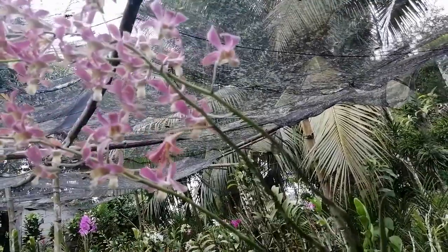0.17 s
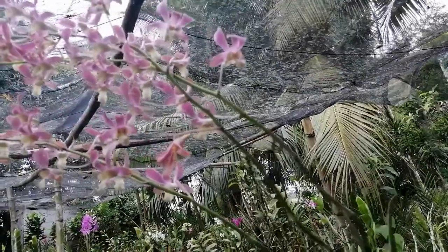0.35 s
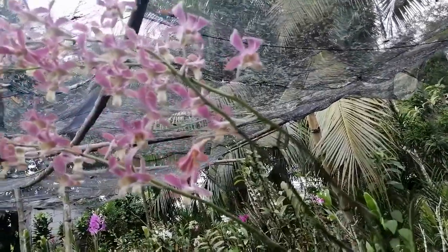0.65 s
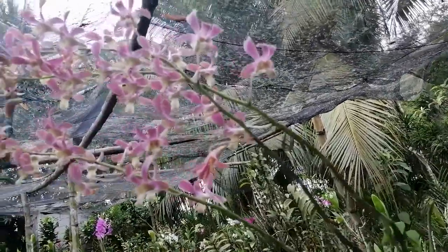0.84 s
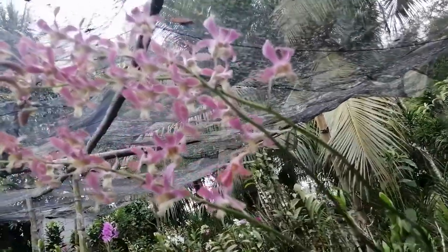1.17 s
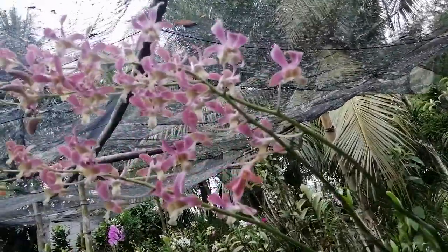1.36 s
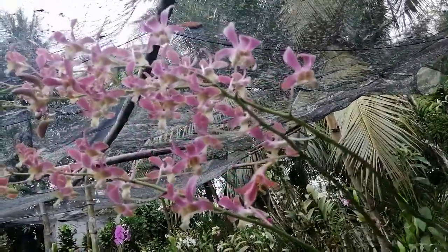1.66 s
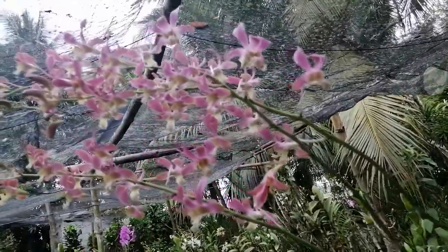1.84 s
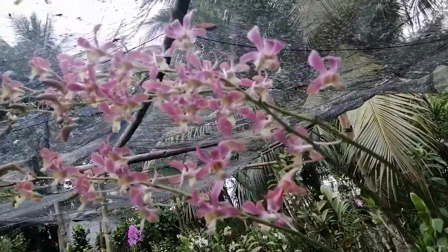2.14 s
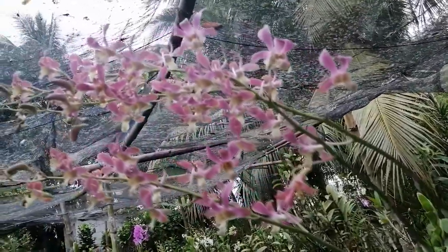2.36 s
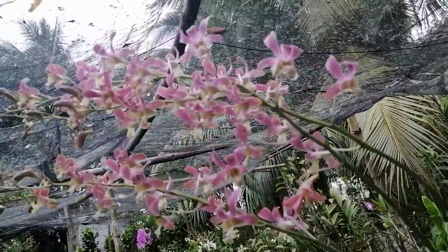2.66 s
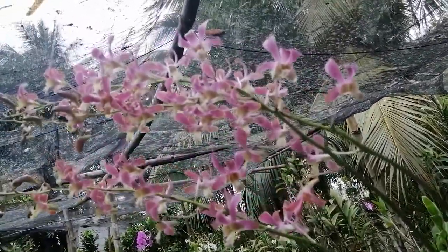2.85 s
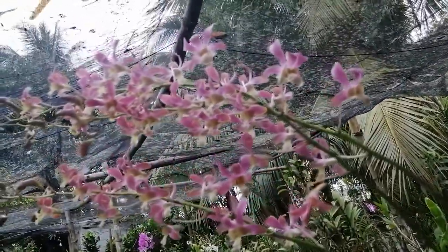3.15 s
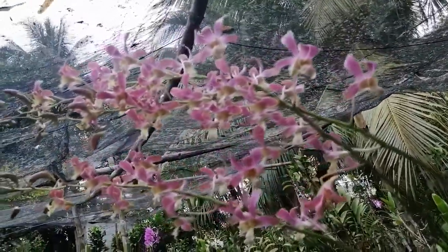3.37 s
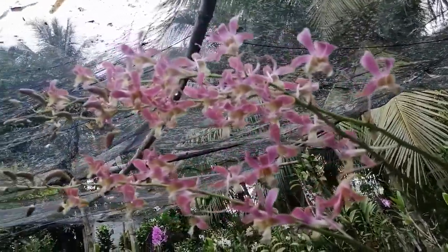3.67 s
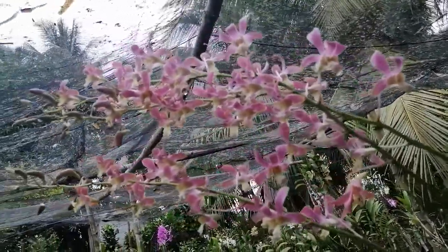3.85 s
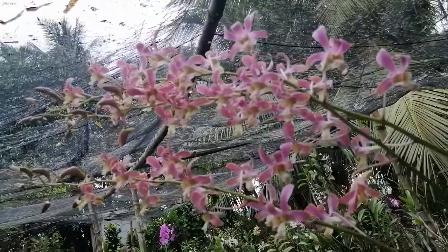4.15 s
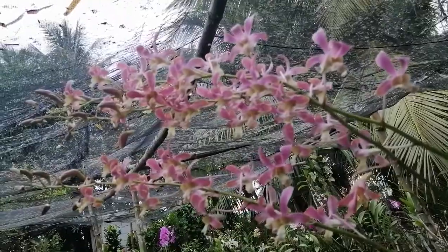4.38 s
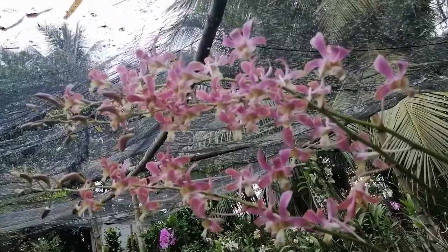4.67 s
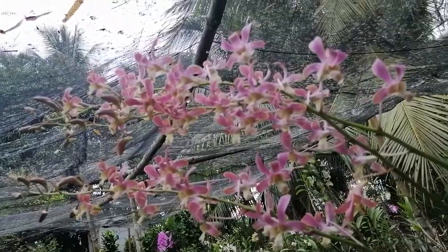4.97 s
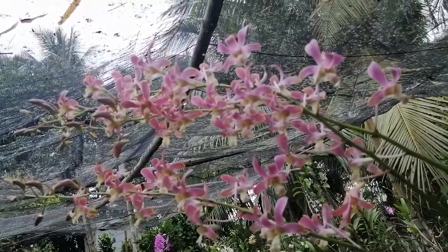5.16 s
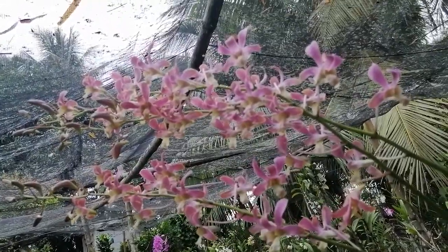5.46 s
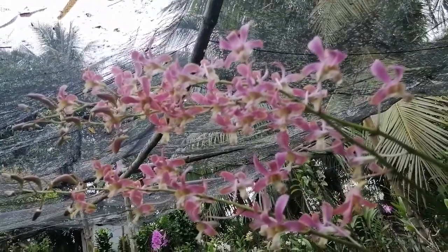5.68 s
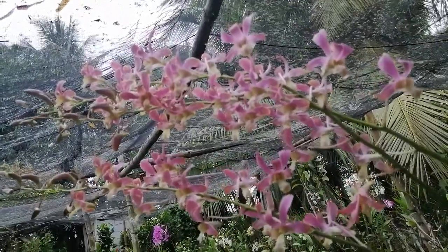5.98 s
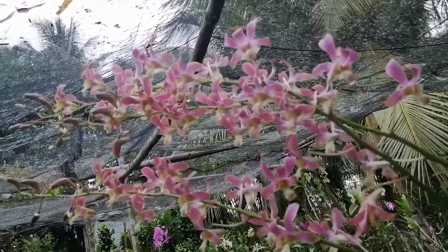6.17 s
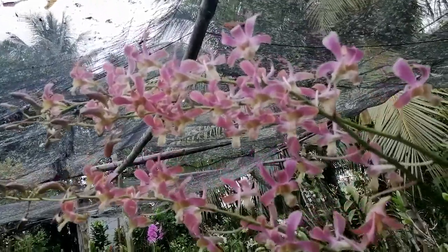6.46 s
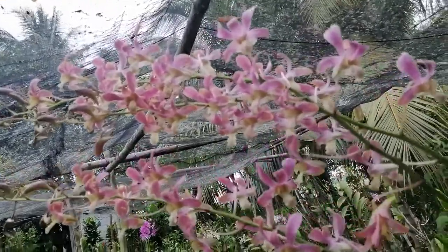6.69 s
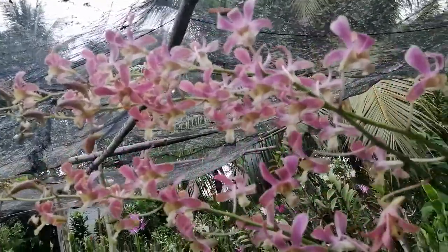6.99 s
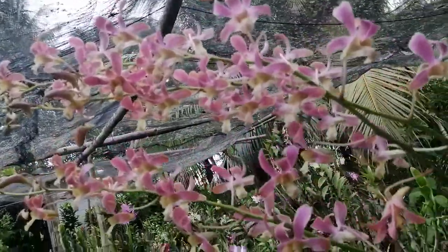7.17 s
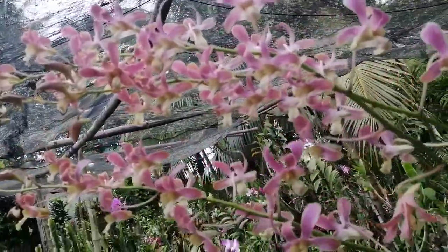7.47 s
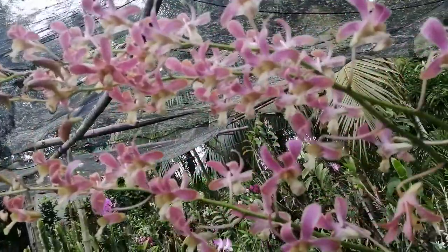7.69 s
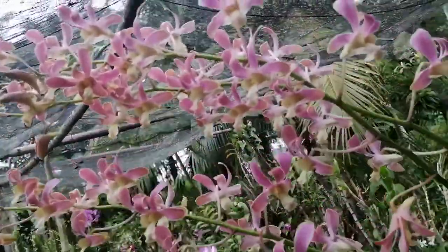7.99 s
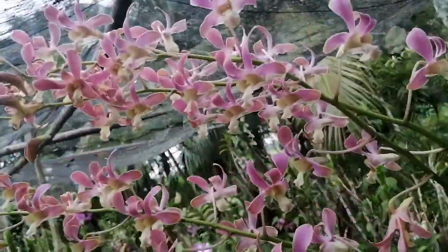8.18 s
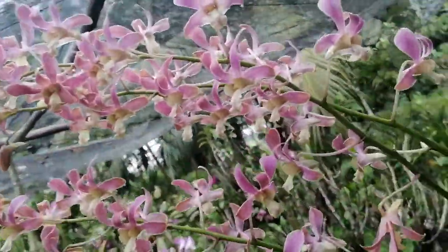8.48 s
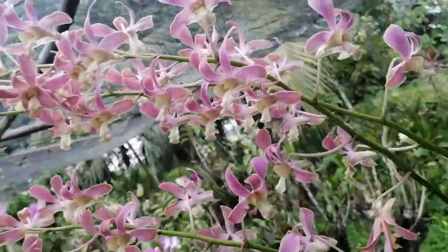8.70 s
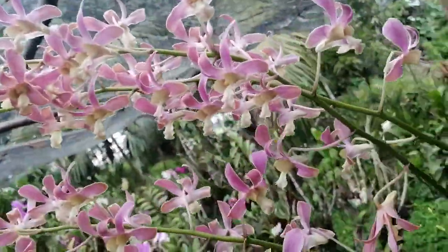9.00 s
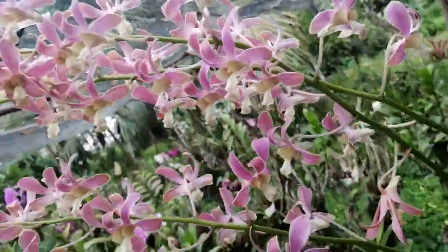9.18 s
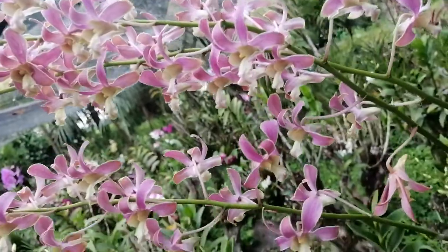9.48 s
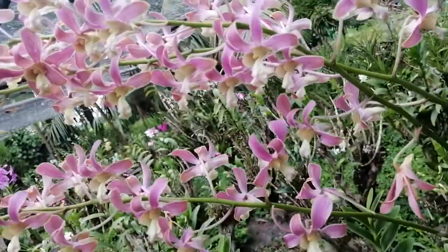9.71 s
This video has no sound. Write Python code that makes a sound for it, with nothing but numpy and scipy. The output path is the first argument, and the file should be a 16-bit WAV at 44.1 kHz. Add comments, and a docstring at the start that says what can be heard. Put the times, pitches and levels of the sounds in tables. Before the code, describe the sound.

Small birds tick, whistle and chatter over a steady high insect drone, with faint far roosters and a dull distant engine in a garden.

```python
"""Tropical garden with birds and a far engine

Insects drone high in the trees while small birds tick, whistle and chatter in the foliage.
Roosters crow far away, an engine thuds in the distance, and light air rumbles underneath.
Birds are gliding, wavering tones with leafy echoes; insects and air are shaped noise.
The engine is a train of puffs ringing in its exhaust pipe, with a deep boom of pure tones."""
import sys
import numpy as np
from scipy import signal
from scipy.fft import rfft, irfft
from scipy.io import wavfile

SR = 44100
rng = np.random.default_rng(int(sys.argv[2]) if len(sys.argv) > 2 else 0)


def dump(signal):
    """Clip the signal to [-1, 1] and save it as 16-bit WAV at the path in sys.argv[1]."""
    limited = np.clip(np.atleast_2d(signal).T, -1, 1)
    pcm = np.round(limited * 32767).astype(np.int16)
    wavfile.write(sys.argv[1], SR, pcm)


N = 433944
TIME = np.arange(N) / SR
FREQS = np.maximum(np.fft.rfftfreq(N, 1 / SR), 1)

# Levels in the tables come before any trim that a source adds.
# Moving air and far garden: tone colour (f/Hz, relative level/dB)
AIR = [(15, -6), (30, -8.5), (48, -7), (70, -3), (140, 3), (190, -5.5), (283, -16), (484, -21),
       (808, -23.5), (1500, -26), (2200, -25), (3100, -28.5), (3950, -36.5), (5200, -21), (6600, -26),
       (8580, -26), (14000, -79)]
# Likeness of its left and right sides (f/Hz, likeness from 0 to 1)
LIKENESS = [(25, 0.66), (80, 0.94), (200, 0.83), (500, 0.51), (1200, 0.012), (6000, 0.097)]
# Its balance (f/Hz, left minus right level/dB)
AIR_PAN = [(100, -2), (500, 1.5), (1500, -4), (3000, -4), (6000, -6), (8300, 13.5)]
# Faint steady tones (centre f/Hz, level/dB)
FAR_HUM = [(48, -66), (398, -80), (465, -88.5), (531, -80.5), (555, -89), (595, -85)]
# Engine speed (t/s, firing rate f/Hz)
ENGINE_RATE = [(0.0, 21.5), (0.13, 22.5), (0.85, 22.0), (1.29, 21.5), (2.14, 21.5), (2.68, 22),
               (4.44, 21.5), (4.93, 22), (6.69, 23), (7.67, 22), (9.48, 22.5), (9.84, 22.5)]
# Loudness of the engine's thud (t/s, level/dB)
ENGINE_DB = [(0, -97), (.8, -63), (1.3, -54), (2.3, -55.5), (2.7, -50.5), (3.4, -50.5), (4.7, -49.5),
             (5.4, -54), (5.95, -49), (6.65, -54.5), (7, -47), (7.7, -49.5), (8.3, -51), (9, -54.5),
             (9.84, -61.5)]
# Exhaust pipe resonances (f/Hz, width/Hz before doubling, relative level/dB)
EXHAUST = [(143.5, 40.4, 1), (177.6, 40, 2), (294, 97, -22)]
# Deep boom of the engine (multiple of the firing rate, centre of its varying relative level/dB)
BOOM = [(2, -22), (3, -21), (4, -9.5), (5, -6.5), (6, -9)]
# Loudness of that boom (t/s, level/dB)
BOOM_DB = [(0, -66), (2.5, -66), (5, -68.5), (6, -50.5), (7.5, -51.5), (8.7, -52), (9.84, -58.5)]
# Hoarse notes of far roosters (t/s, length/s, start f/Hz, end f/Hz, level/dB)
CROWS = [(1.06, 0.2, 883, 975, -60), (1.1, 0.23, 1110, 1060, -57.5), (1.26, 0.148, 1010, 879, -58),
         (1.38, 0.16, 1170, 1064, -63.5), (1.47, 0.16, 936, 1000, -57), (1.6, .12, 1065, 983, -56),
         (1.79, 0.067, 903, 966, -67), (2.93, 0.12, 830, 950, -58), (3.01, 0.18, 1090, 1072, -60),
         (3.12, 0.16, 990, 905, -58.5), (3.32, 0.2, 903, 992, -65), (3.55, 0.15, 1055, 1048, -60),
         (4.66, 0.12, 966, 917, -56.5), (4.72, 0.22, 1165, 988, -56), (4.945, 0.088, 913, 862, -46),
         (4.97, 0.123, 824, 763, -57), (6.46, 0.25, 691, 725, -59), (6.725, 0.076, 655, 672, -51.5),
         (6.8, 0.15, 646, 634, -59), (7.51, 0.08, 924, 1050, -60), (7.58, 0.16, 1157, 1087, -64),
         (7.72, 0.091, 1054, 988, -55), (7.82, 0.098, 980, 937, -60), (7.97, 0.087, 961, 1047, -58.5)]
# Drawn-out answers from farther off (t/s, length/s, start f/Hz, end f/Hz, level/dB)
DRAWLS = [(5.05, 0.29, 827, 810, -65), (5.12, 0.65, 1107, 1231, -68), (5.15, 0.75, 704, 761, -69.5),
          (5.55, 0.56, 779, 827, -71), (5.75, 0.51, 1126, 1050, -67.5), (5.95, 0.242, 878, 925, -69),
          (6.18, 0.35, 970, 907, -69.5), (6.25, 0.54, 643, 657, -68.5)]
# Throat resonances of the squawk (f/Hz, width/Hz of each of two passes, relative level/dB)
SQUAWK_THROAT = [(390, 250, -5.5), (760, 480, -2.5), (1100, 144, 8), (1750, 520, -1), (3330, 520, 8)]
# Soft taps close by (t/s, peak level/dB)
TAPS = [(6.83, -63), (8.52, -58), (8.988, -46.5), (9.201, -36.5)]
# Insect loudness (t/s, pulsing singer level/dB, higher chorus level/dB)
INSECTS = [(0.0, -51.5, -55), (0.19, -48, -56), (0.87, -52.5, -54.5), (1.4, -46, -54.5), (1.64, -51, -54.5),
           (2.44, -49, -55), (2.99, -51.5, -53.5), (3.42, -47, -54), (3.64, -52.5, -54), (4.47, -48, -54.5),
           (4.63, -53, -53), (5.42, -46, -54.5), (5.67, -53, -54), (6.49, -47, -55), (6.63, -51.5, -54.5),
           (8.33, -49.5, -54), (9.67, -48.5, -58), (9.84, -54, -57)]
# Tone colour of the pulsing singer (f/Hz, relative level/dB)
SINGER = [(5500, -54), (6500, -15), (6850, -4.5), (7080, 1.5), (7200, 6.5), (7330, 0), (7550, -8.5),
          (8100, -21), (9000, -49)]
# Tone colour of the higher chorus (f/Hz, relative level/dB)
CHORUS = [(7500, -25.5), (8500, -18.5), (9200, -5), (9700, 3), (10000, 8), (10350, 0), (10650, -3),
          (10900, -3), (11300, -16), (11700, -50), (12500, -49.5), (15000, -22.5)]
# Chatterer's bubbling phrase, hopping between two registers; each pitch then varies by chance
# (delay t/s, length/s, start f/Hz, middle f/Hz, end f/Hz, level/dB)
BUBBLE = [(-.004, .017, 3200, 3555, 3320, -36.5), (.004, .012, 2450, 2756, 3400, -38),
          (.01, 0.014, 2697, 2247, 1780, -41), (.02, 0.0087, 2850, 3170, 3780, -28.5),
          (.028, .016, 2467, 2070, 1930, -39), (.029, .019, 4350, 4150, 3850, -40),
          (.043, .014, 2820, 2942, 3080, -30), (0.059, .014, 3544, 2904, 1780, -37.5)]
# When the bubbling phrase is sung (t/s, added level/dB)
BUBBLES = [(2.111, -1), (3.417, -3.5), (4.558, -2), (5.97, 0.5), (7.266, -2), (8.727, -0.5), (9.556, 0.5)]
# Another phrase, an upward flick and a nearly level note; each pitch then varies by chance
# (delay t/s, length/s, start f/Hz, middle f/Hz, end f/Hz, level/dB)
FLICK = [(0, .026, 2696, 3283, 3890, -35.5), (0.021, .021, 2690, 2490, 2490, -38)]
# When the flick is sung (t/s, added level/dB)
FLICKS = [(5.906, 2.5), (6.069, 3), (9.496, -1.5)]
# Single chirps from deeper in the leaves: one shared pitch shape, evenly spaced (pitch ratio)
CHIRP_SHAPE = [0.58, 1, 1, 0.8, 0.604]
# Their notes (t/s, length/s, base f/Hz, level/dB)
CHIRPS = [(.024, 0.02, 3310, -49), (2.39, 0.035, 2200, -47), (2.534, 0.048, 3150, -45.5),
          (2.881, .027, 3190, -48), (3.531, 0.034, 3420, -44.5), (5.0, .075, 3340, -47),
          (5.02, 0.0393, 1990, -51.5), (5.744, 0.045, 3400, -48.5), (6.14, 0.083, 5040, -45.5),
          (8.2, 0.065, 3510, -41.5), (8.495, .017, 3520, -50), (9.09, 0.1, 3430, -46),
          (9.618, 0.026, 4090, -33.5)]
# Whistler's thin pips, which dip in pitch: shared shape (pitch ratio)
PIP_SHAPE = [1.04, 0.95, 1]
# Their notes (t/s, length/s, base f/Hz, level/dB)
PIPS = [(.621, 0.035, 6160, -35), (.652, 0.027, 6040, -42), (.846, 0.027, 6050, -40),
        (.89, 0.048, 5780, -29), (.99, 0.042, 5700, -39.5), (1.119, 0.2, 5390, -43),
        (3.612, 0.017, 5420, -39.5), (4.257, 0.017, 6150, -34), (4.289, 0.016, 5500, -31.5),
        (6.41, .03, 5880, -37), (7.845, .044, 5540, -33)]
# Whistler's loud slurs, which leap up, dip and rise again: shared shape (pitch ratio)
SLUR_SHAPE = [0.6, 1.02, 1.03, 0.89, 1.1, 1.05]
# Their notes (t/s, length/s, base f/Hz, level/dB)
SLURS = [(.684, 0.039, 5630, -25.5), (2.334, .026, 5940, -28.5), (4.356, .044, 5340, -25.5),
         (6.434, 0.059, 5580, -31)]
# Whistler's steep falls: shared shape (pitch ratio)
PLUNGE_SHAPE = [0.98, 1.03, .9, 0.57]
# Their notes (t/s, length/s, base f/Hz, level/dB)
PLUNGES = [(.724, 0.014, 5040, -28), (.746, .025, 4740, -38.5), (.775, .04, 3600, -44),
           (.768, .05, 5400, -38.5), (.926, 0.012, 4100, -40.5), (4.272, 0.019, 5600, -36),
           (4.298, .017, 5000, -38), (4.408, 0.019, 4900, -32.5), (2.368, .03, 3900, -41),
           (6.478, 0.027, 4360, -39)]
# Whistler's hoarse low notes: shared shape (pitch ratio)
RASP_SHAPE = [0.98, 0.99, 0.85]
# Their notes (t/s, length/s, base f/Hz, level/dB)
RASPS = [(.66, 0.032, 3300, -45.5), (.772, 0.031, 3490, -38), (.8, 0.042, 3050, -47),
         (.83, 0.065, 2690, -52), (.96, 0.021, 3570, -42.5), (2.376, 0.042, 3350, -40),
         (4.335, 0.033, 3440, -45.5), (4.428, 0.029, 3435, -40.5)]
# Dry ticks, singly and in rattling runs (t/s, level/dB)
TICKS = [(0.072, -45), (.187, -41), (0.435, -46), (0.551, -40), (.841, -40), (0.993, -39.5), (1.076, -39),
         (1.141, -38), (1.281, -39), (1.349, -43), (1.42, -39.5), (1.491, -42), (1.565, -39), (1.627, -34),
         (1.73, -36), (1.822, -35), (1.954, -41), (2.028, -38), (2.152, -43), (2.235, -36.5), (2.406, -32),
         (2.476, -42), (2.596, -44), (2.745, -45), (3.052, -46), (3.61, -43), (4.001, -39.5), (5.033, -41),
         (5.094, -43), (6.617, -38), (7.075, -39.5), (7.298, -32), (7.373, -33.5), (7.46, -33),
         (7.538, -34.5), (7.622, -36.5), (7.704, -33), (7.78, -32.5), (7.864, -38.5), (7.933, -31),
         (8.018, -32), (8.108, -31.5), (8.188, -33), (8.254, -31.5), (8.33, -31.5), (8.408, -35.5),
         (8.479, -34.5), (8.577, -40.5), (8.656, -37.5), (8.739, -36.5), (8.824, -37), (8.894, -36),
         (8.963, -33.5), (9.04, -32.5), (9.108, -36.5), (9.178, -36), (9.248, -38), (9.328, -36),
         (9.402, -38), (9.476, -35), (9.548, -33), (9.619, -37), (9.699, -37.5), (9.777, -35)]
# Falling pitch shape of a tick, before chance and sweep size change it (pitch ratio)
TICK_SHAPE = [1.3, 1.17, .98, .78, .48]
# How widely the ticks sweep (t/s, share of the full sweep, base f/Hz)
TICK_SWEEP = [(0, 0.98, 5200), (1.2, .65, 5890), (2.2, 0.66, 5900), (2.4, 0.86, 5400), (7.3, 1.11, 5100),
              (7.65, 0.96, 5100), (7.8, 0.88, 5196), (8.6, 0.83, 5504), (8.85, 0.57, 5200),
              (9.05, 0.57, 5190), (9.2, 0.89, 5205), (9.8, 0.78, 5104)]
# Tone colour the ticker's throat gives (f/Hz, relative level/dB)
TICK_COLOUR = [(1500, 8.5), (3200, 4.5), (3900, -9), (4500, -2.5), (5300, 0), (6200, 0), (8000, -1)]
# Tone balance shared by the small birds, near and far (f/Hz, gain level/dB)
BIRD_COLOUR = [(1500, -4), (2100, 3), (2850, 0.5), (3350, 0.5), (3850, -1), (4400, -2), (4800, -3.5),
               (5250, -1), (6050, -3), (6700, 2), (8000, 1)]


def from_db(db):
    """Turn decibels into a gain."""
    return 10 ** (np.asarray(db) / 20)


def rms_one(x):
    """Scale a sound to an average power of one."""
    return x / np.sqrt(np.mean(x ** 2) + 1e-20)


def in_time(rows):
    """Read each column of a curve at every sample."""
    s, *columns = np.transpose(rows)
    return [np.interp(TIME, s, column) for column in columns]


def over_hz(points):
    """Join the points of a spectrum along a log-frequency axis."""
    hz, value = np.transpose(points)
    return np.interp(np.log(FREQS), np.log(hz), value)


def colour(x, points):
    """Change the tone colour of a sound by a table of levels."""
    return irfft(rfft(x) * from_db(over_hz(points)), N)


def noise(spectrum, alike=0):
    """Make stereo noise of a given colour; a shared part makes left and right alike."""
    mid, side = rfft(rng.standard_normal((2, N)))
    alike = np.clip(alike, -1, 1)
    stereo = np.sqrt(1 + alike) * mid + np.sqrt(1 - alike) * side * [[1], [-1]]
    return rms_one(irfft(stereo * from_db(over_hz(spectrum)), N))


def wander(rate, size):
    """Drift about zero by joining random points with lines, rate points per second."""
    return np.interp(np.arange(size) * rate / SR, np.arange(4096), rng.standard_normal(4096))


def pan(db):
    """Gains for a left-minus-right level difference; a negative one leans right."""
    return from_db(np.array([[.5], [-.5]]) * db)


def resonate(x, hz, width):
    """Ring at one frequency, with about unit gain at the peak; a narrower width rings longer."""
    r = np.exp(-np.pi * width / SR)
    top = np.array([1, 0, -1]) * (1 - r * r) / 2
    bottom = [1, -2 * r * np.cos(2 * np.pi * hz / SR), r * r]
    return signal.lfilter(top, bottom, x + 1e-18)


def ring_through(x, resonances, widen=1):
    """Add up resonances, each passed twice, with alternating signs."""
    out = 0
    for k, (hz, width, db) in enumerate(resonances):
        once = resonate(x, hz, widen * width)
        out = out + (-1) ** k * from_db(db) * resonate(once, hz, widen * width)
    return out


def add(track, s, sound):
    """Mix a sound in at a time in seconds."""
    at = max(int(s * SR), 0)
    track[..., at:at + sound.shape[-1]] += sound[..., :max(N - at, 0)]


def syllable(length, pitches, waver, waver_rate):
    """Phase and envelope of one note that glides through evenly spaced pitches."""
    u = np.linspace(0, 1, int(length * SR))
    hz = np.interp(u, np.linspace(0, 1, len(pitches)), pitches)
    hz = hz * (1 + waver * wander(waver_rate, len(u)))
    return 2 * np.pi * np.cumsum(hz) / SR, np.sqrt(2) * signal.windows.tukey(len(u), .5)


def shaped(rows, shape):
    """Make notes (time, length, pitches, dB) that share one pitch shape."""
    return [(s, length, hz * np.array(shape), db) for s, length, hz, db in rows]


def gliding(rows):
    """Make notes (time, length, pitches, dB) that glide from one pitch to another."""
    return [(s, length, pitches, db) for s, length, *pitches, db in rows]


def repeated(rows, phrase):
    """Make notes (time, length, pitches, dB) of a phrase sung again and again."""
    return [(s + delay, length, pitches, db + note_db)
            for s, db in rows
            for delay, length, *pitches, note_db in phrase]


def sing(notes, waver, waver_rate, partials=()):
    """Sing wavering tones; the throat may add partials (ratio to the main tone, dB)."""
    out = np.zeros(N)
    for s, length, pitches, db in notes:
        phase, envelope = syllable(length, pitches, waver, waver_rate)
        tone = np.sin(phase)
        for ratio, part_db in partials:
            tone = tone + from_db(part_db) * np.sin(ratio * phase)
        add(out, s, from_db(db) * envelope * tone)
    return out


def foliage(x, direct_db, scatter_db, scatter_t60, tail_db, tail_t60):
    """Leaves scatter a call within moments; farther trees return a faint tail."""
    t = np.arange(SR) / SR
    # each t60 is the time in seconds for the echo to fade by 60 dB
    near, far = rng.standard_normal((2, 2, SR))
    near = rms_one(near * from_db(-60 * t / scatter_t60))
    far = rms_one(far * from_db(-60 * t / tail_t60))
    echo = (from_db(scatter_db) * near + from_db(tail_db) * far) / np.sqrt(SR)
    echo[0, 0] += from_db(direct_db)
    echo[1, 20] += from_db(direct_db)   # the right side hears it 20 samples later
    return signal.fftconvolve(np.atleast_2d(x), echo, axes=1)[:, :N]


def air(level_db=-52.0):
    """Low rumble of moving air and the faint wash of the far garden, as coloured noise."""
    wash = noise(AIR, over_hz(LIKENESS))
    wash = irfft(rfft(wash) * pan(over_hz(AIR_PAN)), N)
    return from_db(level_db + 0.045 * wander(9.3, N)) * wash


def hum(waver=0.00792):
    """A faint hum far away: a few pure tones, each wavering in pitch."""
    out = 0
    for hz, db in FAR_HUM:
        phase = 2 * np.pi * hz * np.cumsum(1 + waver * wander(12, N)) / SR
        out = out + from_db(db) * rms_one(np.sin(phase))
    return out


def far_birds(count=260, level_db=-58.5, hz=3000, spread=0.14, spread_db=2.0):
    """Many faint chirps from the edge of the garden blend into a murmur of birdsong."""
    out = np.zeros(N)
    for k, (when, loud, *pitches) in enumerate(rng.standard_normal((count, 5))):
        glide = hz * np.exp(spread * np.array(pitches))
        phase, envelope = syllable(0.046, glide, waver=0.0572, waver_rate=700)
        start = (k + .3 * when) / count * N / SR
        add(out, start, from_db(level_db + spread_db * loud) * envelope * np.sin(phase))
    return foliage(out, direct_db=-14, scatter_db=-10.5, scatter_t60=0.27,
                   tail_db=-7.5, tail_t60=0.95) * pan(-5)


def boom(waver_db=3.0):
    """Low multiples of the firing rate carry as clean tones and swell as the engine works."""
    turns = np.cumsum(in_time(ENGINE_RATE)[0]) / SR
    tones = 0
    for multiple, db in BOOM:
        tone = np.cos(2 * np.pi * multiple * turns)
        tones = tones + from_db(db + waver_db * wander(4.5, N)) * tone
    return np.sqrt(2) * from_db(in_time(BOOM_DB)[0]) * tones * pan(-0.62)


def engine(level_db=-1, uneven_db=0.65, dull_hz=430, echo_s=0.01577, echo_db=-15):
    """One exhaust puff per firing rings in the pipe; distance leaves a dull thud and an echo."""
    turns = np.cumsum(in_time(ENGINE_RATE)[0]) / SR
    puffs = np.diff(np.floor(turns), prepend=0)   # one impulse per firing
    puffs = puffs * from_db(uneven_db * wander(22, N))
    thud = ring_through(puffs, EXHAUST, widen=2)
    thud = signal.sosfilt(signal.butter(4, dull_hz, fs=SR, output="sos"), thud)
    thud = thud + from_db(echo_db) * np.interp(TIME - echo_s, TIME, thud)
    return from_db(in_time(ENGINE_DB)[0] + level_db) * rms_one(thud) * pan(-4.0)


def roosters(level_db=-2.0, drawl_db=0.5):
    """From afar only the strongest partials of each crow carry, hoarse and full of echo."""
    crows = sing(gliding(CROWS), waver=.045, waver_rate=220)
    crows = crows * from_db(3 * wander(35, N))   # the crows break up in loudness
    drawls = sing(gliding(DRAWLS), waver=.065, waver_rate=260)
    crows = foliage(crows, direct_db=-10.5, scatter_db=-0.5, scatter_t60=0.12,
                    tail_db=-5.0, tail_t60=1.0)
    drawls = foliage(drawls, direct_db=-10, scatter_db=1, scatter_t60=0.28,
                     tail_db=-1.5, tail_t60=1.0)
    return (from_db(level_db) * crows + from_db(drawl_db) * drawls) * pan(-3.2)


def squawk(start_s=8.17, length=0.077, level_db=-43.0, rattle_hz=70, rattle=0.35):
    """One harsh call: a rattling rasp of noise through the throat's resonances."""
    out = np.zeros(N)
    rasp = rng.standard_normal(int(length * SR))
    rasp = rasp * np.hanning(len(rasp))
    rasp = rasp * (1 + rattle * np.sin(2 * np.pi * rattle_hz * TIME[:len(rasp)]))
    add(out, start_s, from_db(level_db) * rms_one(ring_through(rasp, SQUAWK_THROAT)))
    return foliage(out, direct_db=-12, scatter_db=-3.5, scatter_t60=0.07,
                   tail_db=-2, tail_t60=0.51) * pan(-5)


def taps(hz=560, width_hz=750):
    """Dull, dead clicks: an impulse through a broad resonance that dies at once."""
    out = np.zeros(N)
    click = ring_through(signal.unit_impulse(500), [(hz, width_hz, 0)])
    for s, db in TAPS:
        add(out, s, from_db(db) * click / np.abs(click).max())
    return out


def insects(pulse_hz=18.75, gap_depth=0.46, buzz_hz=156, buzz_depth=0.21,
            singer_db=-2.0, chorus_db=3.0, flutter_db=1.1, flutter_rate=18):
    """One singer buzzes in quick pulses with brief dips; a higher chorus blends to a hiss."""
    pulse = np.cumsum(pulse_hz * (1 + 0.00075 * wander(4.2, N))) / SR
    gate = 1 - gap_depth * (.5 + .5 * np.cos(2 * np.pi * pulse)) ** 30   # high power: brief dips
    cycles = np.cumsum(buzz_hz * (1 + 0.0457 * wander(7.8, N))) / SR
    buzz = 1 + buzz_depth * np.sin(2 * np.pi * cycles)
    singer_level, chorus_level = in_time(INSECTS)
    loudness = from_db(singer_level + singer_db + flutter_db * wander(flutter_rate, N))
    singer = loudness * rms_one(gate * buzz) * noise(SINGER) * pan(-17.5)
    chorus = from_db(chorus_level + chorus_db) * noise(CHORUS) * pan(-3.4)
    return singer + chorus


def chatterer(pitch_spread=0.027, near_db=1.0, fray_db=-13):
    """Quick, varied phrases ride on the second harmonic of a weak fundamental; chirps are harsher."""
    notes = []
    for s, length, pitches, db in repeated(BUBBLES, BUBBLE) + repeated(FLICKS, FLICK):
        varied = np.array(pitches) * (1 + pitch_spread * rng.standard_normal(3))
        notes.append((s, length, varied, db + near_db))
    # fundamental, third and fourth harmonics, as ratios to the second
    harmonics = [(.5, -19), (1.5, -15), (2, -20)]
    near = sing(notes, waver=0.028, waver_rate=750, partials=harmonics)
    near = near + from_db(fray_db) * sing(notes, waver=0.165, waver_rate=1800)
    deep = sing(shaped(CHIRPS, CHIRP_SHAPE), waver=0.166, waver_rate=1800)
    near = foliage(near, direct_db=-7, scatter_db=-7.5, scatter_t60=0.094,
                   tail_db=-16.0, tail_t60=0.44)
    deep = foliage(deep, direct_db=-7, scatter_db=-3.5, scatter_t60=0.093,
                   tail_db=-7.5, tail_t60=0.28)
    return near * from_db([[-9.5], [0]]) + deep * from_db([[-8], [0]])   # quieter on the left


def whistler(hoarse_db=2.5, fray_db=-13):
    """Nearly pure pips, slurs and plunges that fray a little; fast pitch waver makes lows hoarse."""
    sweeps = shaped(SLURS, SLUR_SHAPE) + shaped(PLUNGES, PLUNGE_SHAPE)
    clear = sing(shaped(PIPS, PIP_SHAPE) + sweeps, waver=0.021, waver_rate=708)
    hoarse = from_db(hoarse_db) * sing(shaped(RASPS, RASP_SHAPE), waver=0.083, waver_rate=1500)
    hoarse = hoarse + from_db(fray_db) * sing(sweeps, waver=0.089, waver_rate=1700)
    clear = foliage(clear, direct_db=-4.5, scatter_db=-6.5, scatter_t60=0.2,
                    tail_db=-9.5, tail_t60=0.75)
    hoarse = foliage(hoarse, direct_db=-5.5, scatter_db=-7.5, scatter_t60=0.38,
                     tail_db=-10.5, tail_t60=1.0)
    return clear * from_db([[-7], [0]]) + hoarse * from_db([[-5], [0]])   # quieter on the left


def ticker(length=.023, length_spread=.2, pitch_spread=.07):
    """Each tick is a fast, rough, varied plunge, coloured by the throat and scattered by leaves."""
    times, sweep, hz = np.transpose(TICK_SWEEP)
    notes = []
    for s, db in TICKS:
        chance = rng.standard_normal(1 + len(TICK_SHAPE))
        shape = np.array(TICK_SHAPE) * (1 + pitch_spread * chance[1:])
        # a smaller power flattens the plunge
        pitches = np.interp(s, times, hz) * shape ** np.interp(s, times, sweep)
        notes.append((s, length * np.exp(length_spread * chance[0]), pitches, db))
    ticks = colour(sing(notes, waver=0.1153, waver_rate=2400), TICK_COLOUR)
    return foliage(ticks, direct_db=-8, scatter_db=-2.5, scatter_t60=0.23,
                   tail_db=-4.0, tail_t60=0.68) * from_db([[-7], [0]])   # quieter on the left


def scene():
    """Mix the garden: birds and insects lean right, while hum and taps sit in the middle."""
    background = air() + hum() + boom() + engine() + roosters() + squawk() + taps()
    birds = colour(far_birds() + chatterer() + whistler() + ticker(), BIRD_COLOUR)
    return background + insects() + birds


def record(dry):
    """Cut the treble steeply above 15.2 kHz."""
    return signal.sosfilt(signal.ellip(10, .1, 80, 15200, fs=SR, output="sos"), dry)


dry = scene()
out = record(dry)
dump(out)
```